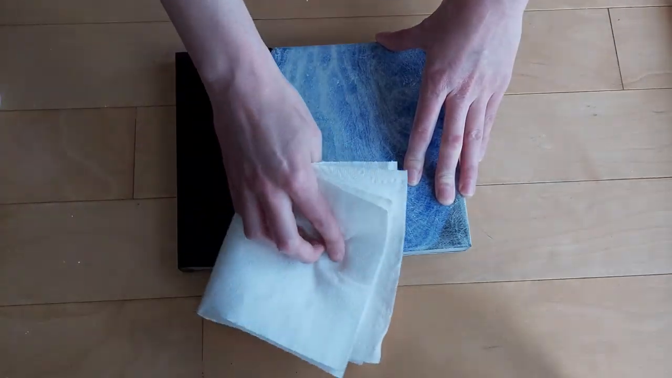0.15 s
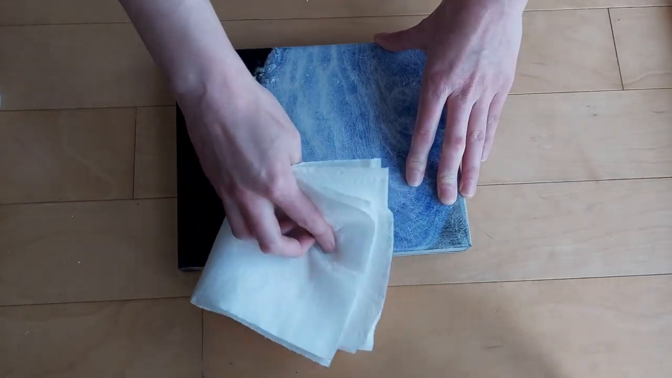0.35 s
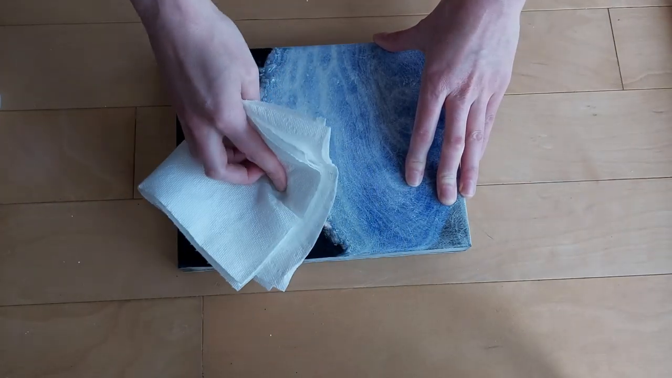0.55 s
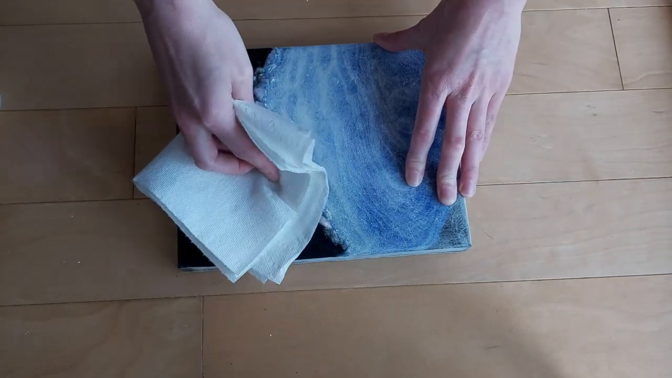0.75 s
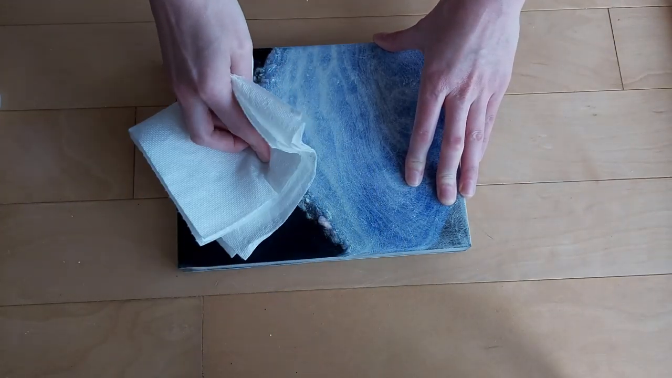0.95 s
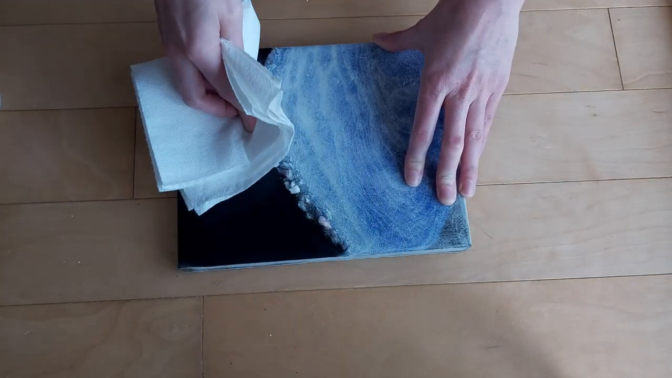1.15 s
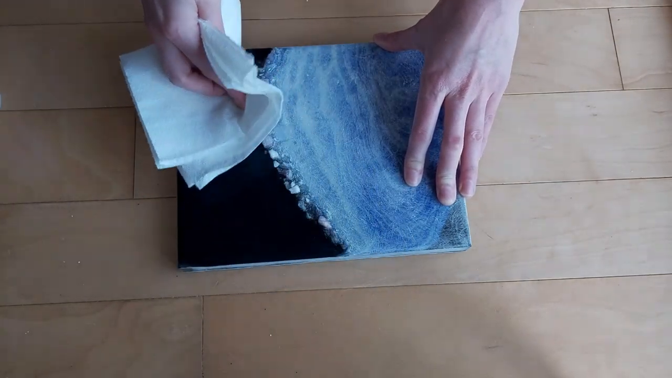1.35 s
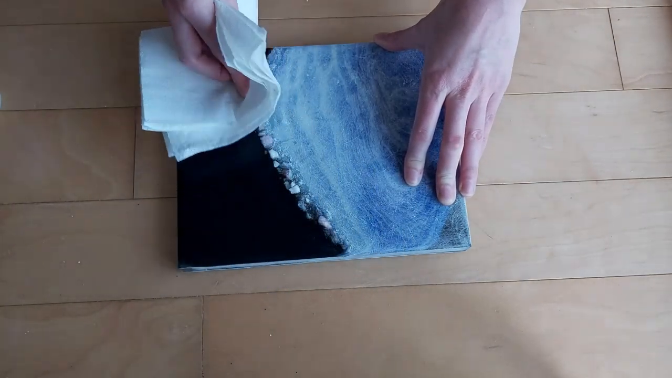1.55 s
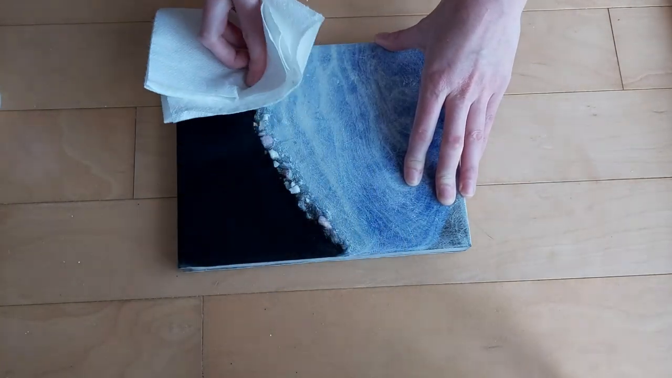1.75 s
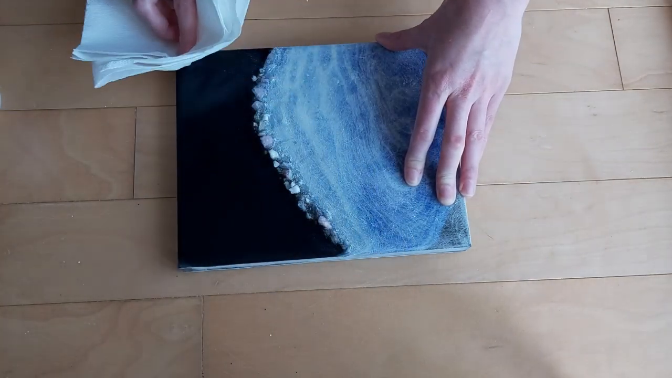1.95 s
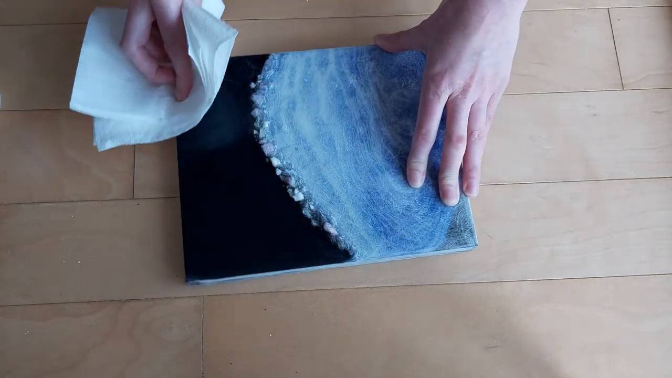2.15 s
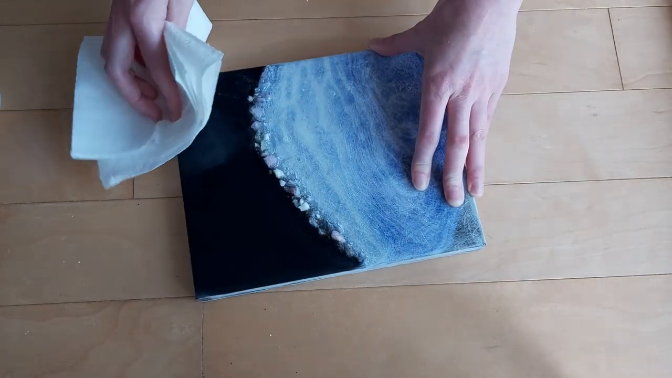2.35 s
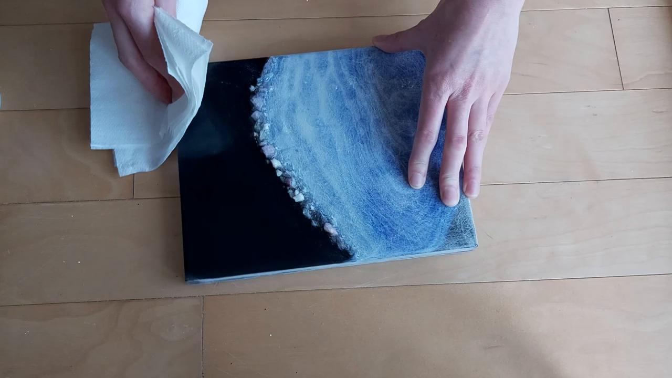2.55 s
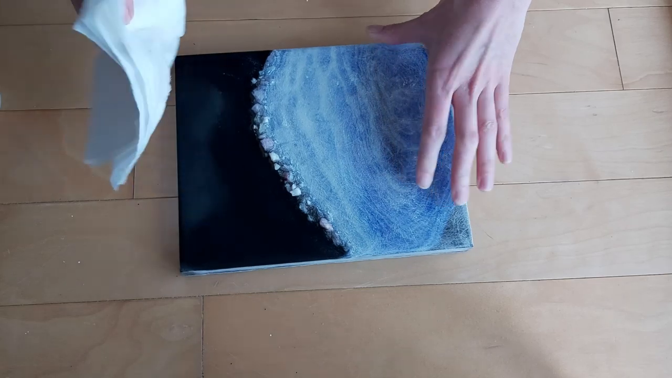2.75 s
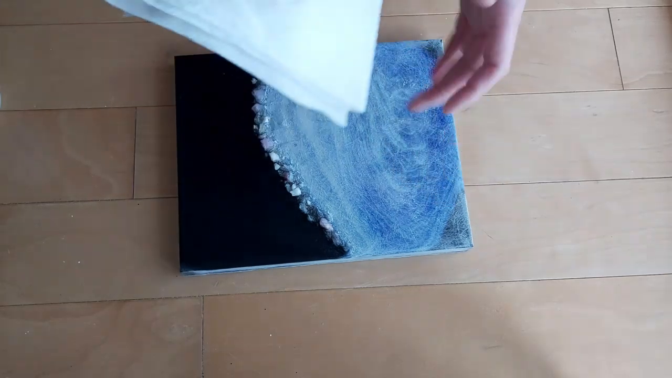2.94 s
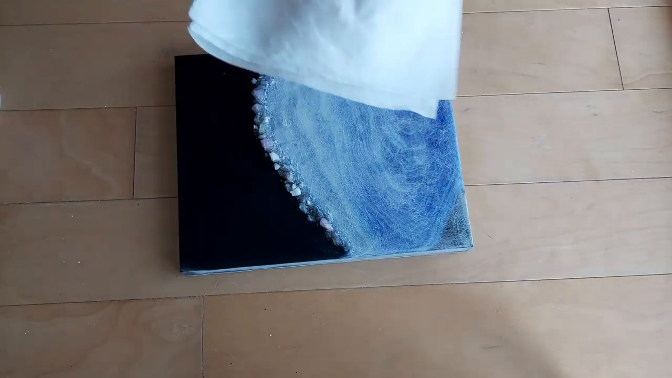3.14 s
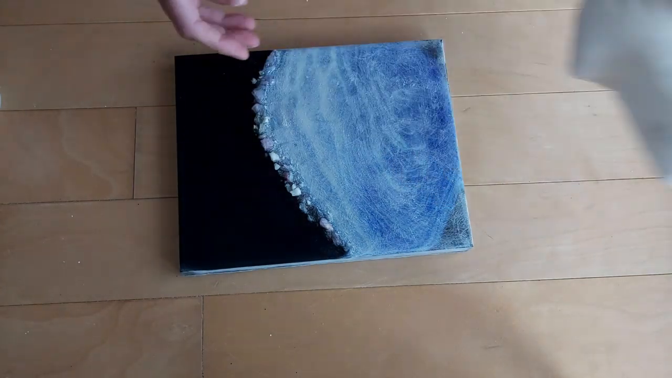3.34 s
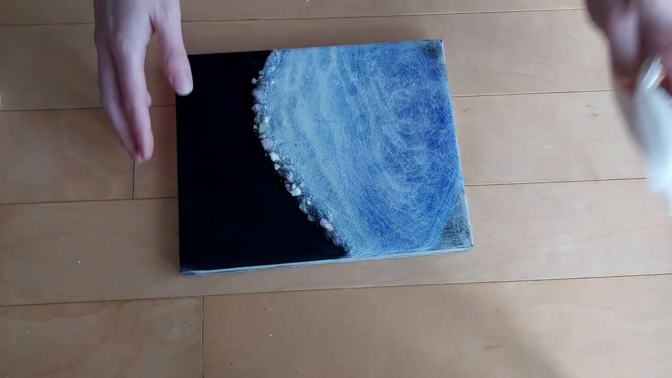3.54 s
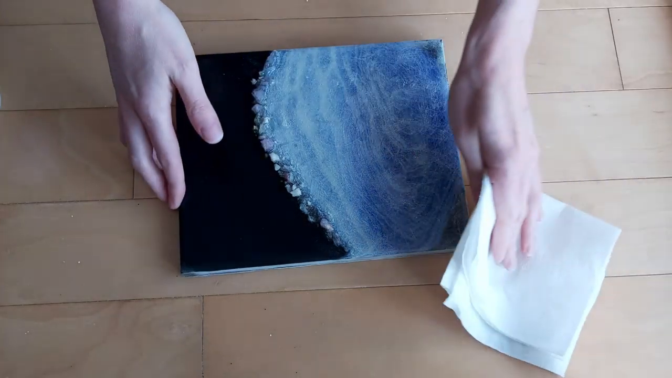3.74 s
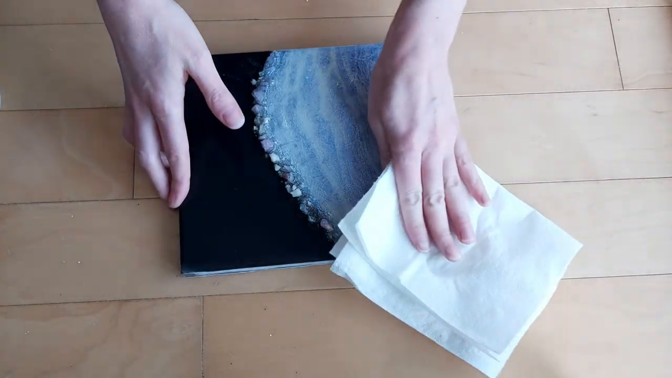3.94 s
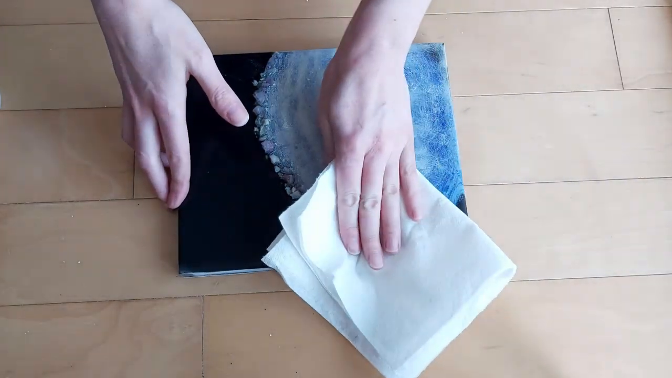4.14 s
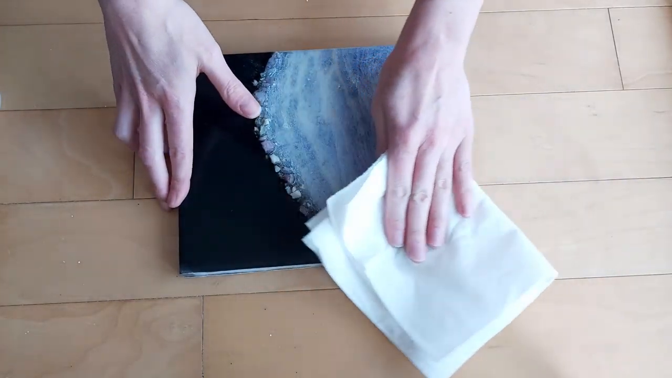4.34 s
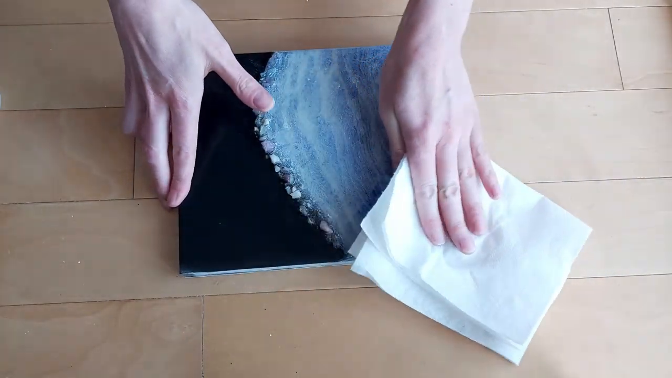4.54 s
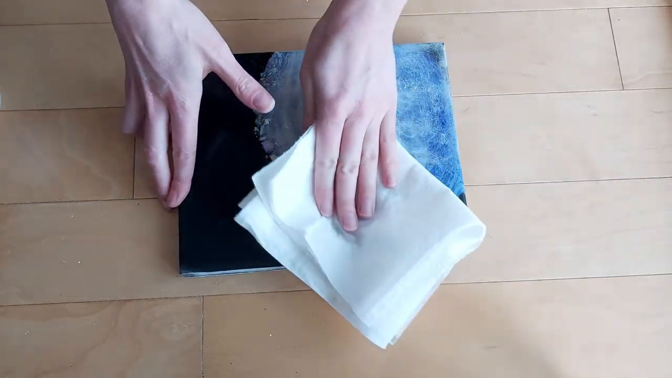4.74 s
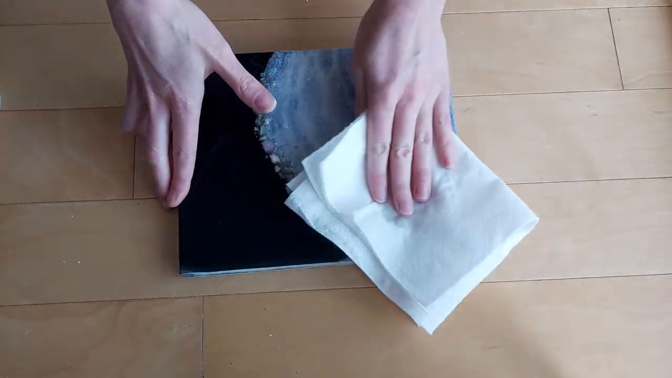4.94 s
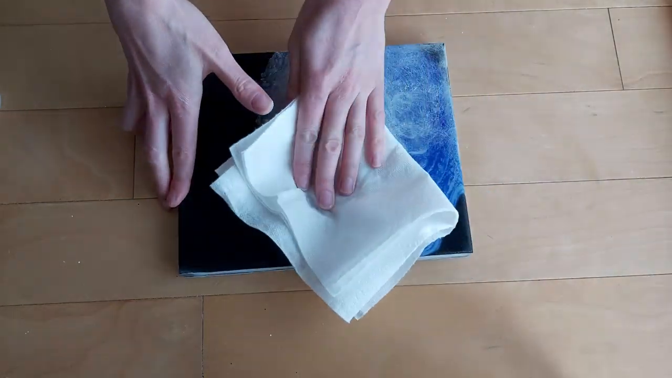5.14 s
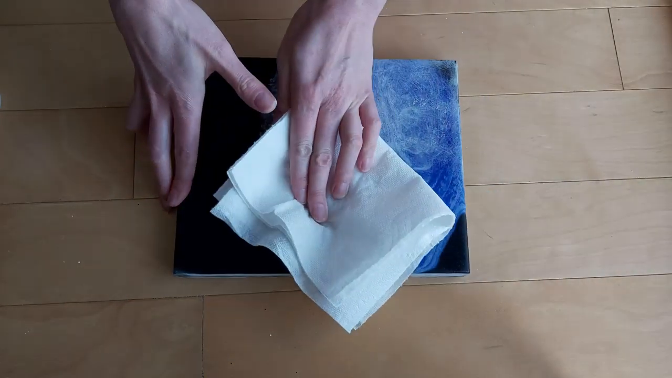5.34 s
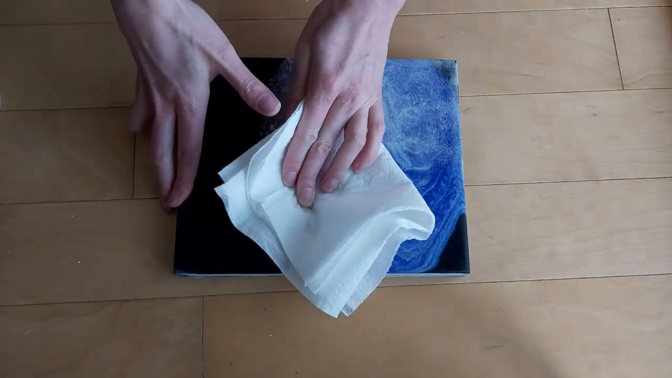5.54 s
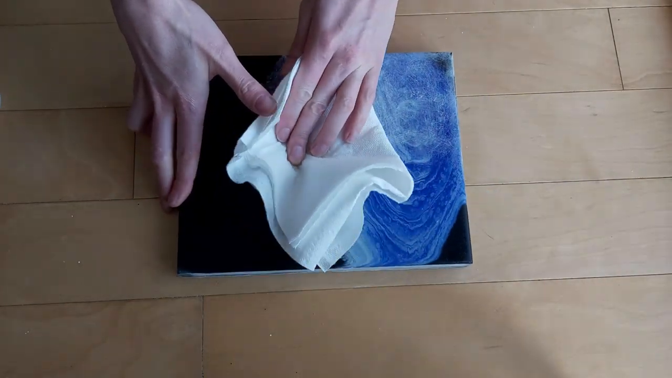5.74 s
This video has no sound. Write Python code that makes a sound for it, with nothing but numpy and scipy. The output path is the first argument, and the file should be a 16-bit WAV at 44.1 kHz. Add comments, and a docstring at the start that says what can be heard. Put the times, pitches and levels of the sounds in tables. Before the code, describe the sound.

Close stereo sound of a folded damp paper towel wiping a painted canvas on a wooden floor. Soft, fibrous strokes come about four a second, then the canvas jolts with a loud hollow knock and further bumps. The towel is handled quietly, and louder, crisper scrubbing follows with small snags. A small room adds a short faint reflection over low air noise, slightly left.

```python
"""A quiet room with a wooden floor: a damp paper towel scrubs a coated canvas, heard close up in stereo.
Paper fibres catch and slip in dense tiny clicks, made of noise with uneven sizes, in three spectral bands.
The stretched canvas and its frame hum like a drum when pushed, slid or knocked on the boards: noise and
soft pulses pass through resonances. Folds snag, damp paper squeaks, and air noise and mains hum lie behind."""
import sys
import numpy as np
from scipy import signal
from scipy.fft import rfft, irfft, next_fast_len
from scipy.io import wavfile
from scipy.ndimage import uniform_filter1d

SR = 44100
rng = np.random.default_rng(int(sys.argv[2]) if len(sys.argv) > 2 else 0)


def int16_out(signal):
    """Quantize to a 16-bit WAV file."""
    q = np.round(np.clip(np.atleast_2d(signal).T, -1, 1) * 32767)
    wavfile.write(sys.argv[1], SR, q.astype(np.int16))


N = 259746  # length in samples

# resonances of the stretched canvas on its frame: pitch_hz, width_hz, level_db [relative]
CANVAS_MODES = [(199, 46, -15), (270.4, 22.6, -10), (357.9, 19.6, -0.5), (433, 15.8, -0.5),
                (487.6, 22.5, -4.5), (554, 62, -7.5), (679, 43, -7), (825, 120, -12.5), (1180, 130, -17),
                (1470, 46, -15), (2785, 64, -17.5)]
# spectrum of the coarse scrape, also of the rattle in a knock: pitch_hz, density_db [relative, per Hz]
RASP_SPECTRUM = [(500, -21), (850, -4.5), (1050, 2), (1600, 3.5), (2500, 2.5), (3200, -2.5), (5000, -14)]
RASP_LEFT_DB = 5.5  # left above right, also for snags and squeaks


def gain_of(db):
    """Turns decibels into an amplitude factor."""
    return 10 ** (np.asarray(db) / 20)


def evened(x):
    """Scales a signal to an RMS of one over all its channels."""
    return x / np.sqrt(np.mean(x ** 2) + 1e-20)


def colour(x, points):
    """Filters the channels by a spectrum, drawn between points on a logarithmic pitch axis."""
    point_hz, point_db = np.transpose(points)
    size = next_fast_len(N)
    hz = np.fft.rfftfreq(size, 1 / SR)
    curve_db = np.interp(np.log(hz + 1), np.log(point_hz + 1), point_db)
    return irfft(rfft(x, size) * gain_of(curve_db), size)[..., :N]


def pair(same):
    """Two channels of white noise with the given correlation."""
    left, other = rng.standard_normal((2, N))
    same = np.clip(same, 0, 1)
    return np.array([left, same * left + np.sqrt(1 - same ** 2) * other])


def sides(left_db):
    """Stereo gains that set the left channel this far above the right."""
    return gain_of(np.array([[.5], [-.5]]) * left_db)


def flicker(ms, db):
    """A random gain, smoothed over some milliseconds, with an RMS swing in dB."""
    drift = uniform_filter1d(rng.standard_normal(N), max(int(ms * SR / 1000), 1))
    return gain_of(db * evened(drift))


def mottle(x, db):
    """Patches of the noise's spectrum swell and sink at random over pitch and time."""
    spectra = signal.stft(x, nperseg=512)[2]
    patches = rng.standard_normal(spectra.shape[1:])
    patches = uniform_filter1d(patches, size=3, axis=0)  # across pitch
    patches = uniform_filter1d(patches, size=7, axis=1)  # across time
    return signal.istft(spectra * gain_of(db * evened(patches)), nperseg=512)[1][:, :N]


def swell(rows, motion):
    """Each row (start, rise, hold, dB, change dB) rises, drifts in level, stops fast and lingers; powers add."""
    steepness, stop_db_s, linger_db, fade_db_s = motion
    power = np.zeros(N)
    for start, rise, hold, db, change_db in rows:
        t = np.arange(0, rise + hold + 1, 1 / SR)
        after = np.maximum(t - rise - hold, 0)
        stop = gain_of(-stop_db_s * after)
        linger = gain_of(linger_db - fade_db_s * after)
        end = (stop + linger) / (1 + gain_of(linger_db))
        drift = gain_of(db + change_db * np.clip((t - rise) / hold, 0, 1))
        onset = np.sin(np.pi / 2 * np.minimum(t / rise, 1)) ** steepness
        part = power[round(start * SR):][:len(t)]  # a view: adding to it fills power
        part += ((onset * drift * end) ** 2)[:len(part)]
    return np.sqrt(power)


def ring(x, modes=CANVAS_MODES, sign=-1):
    """Passes a force through modes of the canvas on its frame; the small drum radiates no deep bass."""
    out = 0
    for k, (hz, width, db) in enumerate(modes):
        mode = signal.lfilter(*signal.iirpeak(hz, hz / width, SR), x)
        out = out + sign ** k * gain_of(db) * mode
    return signal.sosfilt(signal.butter(4, 165, "high", fs=SR, output="sos"), out)


def room():
    """Air and appliance noise, mottled over pitch and time, with a wavering mains hum."""
    # spectrum of the air noise: pitch_hz, density_db [relative, per Hz]
    air_spectrum = [(20, -10), (76, 9.5), (130, 15), (249, 5.5), (416, 8), (677, -4), (1370, -3.5),
                    (2990, -14.5), (6050, -1), (8590, -14.5), (16000, -9)]
    # mains hum before wavering and stereo tilt: pitch_hz, level_db [RMS]
    hum_tones = [(59, -80)]
    t = np.arange(N) / SR
    hum = sum(gain_of(db) * np.sqrt(2) * np.sin(2 * np.pi * hz * t) for hz, db in hum_tones)
    air = gain_of(-69) * evened(mottle(colour(pair(0.34), air_spectrum), db=4.0))
    return sides(9) * (air + hum * flicker(ms=80, db=4))


def towel():
    """Slips of fibres, a few of them large, in three sizes; all share the unevenness of the surface."""
    # wipes or handlings of the towel: start_s, speeding_up_s, moving_s, hiss_db, fizz_db,
    # hiss_and_fizz_change_db [while moving], rasp_db, rasp_change_db [while moving]
    strokes = np.array([(0.055, 0.062, 0.139, -48.0, -48.5, -4, -51.5, 0),
                        (0.352, 0.14, 0.125, -43, -45, -2, -50, -2),
                        (0.77, 0.071, 0.089, -48.5, -52, 1, -50.5, -10),
                        (1.044, 0.045, 0.1, -48.5, -52, 2.0, -58, 5),
                        (1.308, 0.073, 0.097, -48.5, -52.5, 0, -52.5, -1),
                        (1.551, 0.07, 0.13, -49.0, -52, -9, -55.0, -3),
                        (1.796, 0.14, 0.044, -46, -47.5, 0, -52, -5),
                        (2.016, 0.026, 0.14, -63.5, -68, 11.5, -64.0, 6.5),
                        (2.188, 0.015, 0.1, -40.5, -43, -3, -38.5, -5),
                        (2.526, 0.037, 0.11, -54.0, -63, 1, -52.5, 4),
                        (2.82, 0.12, 0.075, -70.5, -61.5, -6.5, -90, 17),
                        (3.128, 0.017, 0.057, -63, -64.5, 4.5, -63.5, 7.5),
                        (3.19, 0.04, 0.14, -54, -53.5, -1.5, -54, -2),
                        (3.375, 0.093, 0.054, -58.5, -61, -12, -58.5, -9.0),
                        (3.524, 0.052, 0.172, -56.5, -54.5, -1, -57, 2.0),
                        (3.775, 0.055, 0.051, -58, -59.5, -5.5, -60.5, -6),
                        (3.884, 0.082, 0.029, -47.0, -46, -1.5, -49.5, -0.5),
                        (3.989, 0.14, 0.016, -38.0, -37.0, -5, -42.5, -4.5),
                        (4.185, 0.02, 0.008, -56.0, -70, -0.0, -50, -1),
                        (4.216, 0.2, 0.11, -44.5, -42, -5.5, -46, -3.0),
                        (4.599, 0.12, 0.082, -43.5, -40, -0.5, -48, 3),
                        (4.837, 0.12, 0.052, -41.5, -38.5, -8.5, -44, -4),
                        (4.997, 0.121, 0.03, -41.0, -38.5, -3.5, -48, 6),
                        (5.227, 0.084, 0.095, -56.5, -62.5, 1, -44.5, -17),
                        (5.459, 0.052, 0.18, -58.0, -57.5, -2, -57, 1.0),
                        (5.657, 0.058, 0.11, -51.5, -50.5, 2.0, -49, -3.0),
                        (5.835, 0.034, 0.021, -50.0, -49, 2.5, -47.5, 8)])
    # spectra of medium and of fine slips, each: pitch_hz, density_db [relative, per Hz]
    hiss_spectrum = [(1500, -21.5), (3000, -9), (4200, -4), (6300, -2.5), (7200, -6), (8300, -11.5),
                     (11000, -35)]
    fizz_spectrum = [(6000, -27), (8300, -10.5), (10000, -6.5), (12500, -3.5), (14500, -2), (16500, -6)]
    # start and end of a wipe: rise_steepness [exponent], stop_db_per_s, linger_db, linger_fade_db_per_s
    towel_motion = (1.3, 494, -10.5, 89)
    sizes = gain_of(1.56 * np.minimum(rng.exponential(1, N), 6))
    slips = sizes * flicker(ms=1.5, db=.9)
    hiss = evened(colour(slips * pair(0.038), hiss_spectrum)) * sides(3.5)
    rasp = evened(colour(slips * pair(0.086), RASP_SPECTRUM)) * sides(RASP_LEFT_DB)
    fizz = evened(colour(slips * pair(0.074), fizz_spectrum)) * sides(9)
    hiss = hiss * swell(strokes[:, [0, 1, 2, 3, 5]], towel_motion)
    fizz = fizz * swell(strokes[:, [0, 1, 2, 4, 5]], towel_motion)
    rasp_gain = swell(strokes[:, [0, 1, 2, 6, 7]], towel_motion)
    return mottle(rasp, db=1.5) * rasp_gain + mottle(hiss + fizz, db=1.52)


def drumming():
    """Steady drag and separate small bumps shake the canvas; a hand pressing its middle favours the upper modes."""
    # pushes or slides, levels before stereo tilt: start_s, building_s, dragging_s, lowest_modes_db,
    # upper_modes_db, change_db [while dragging]
    pushes = np.array([(0.065, 0.015, 0.19, -64.0, -64.5, 2), (0.347, 0.116, 0.15, -64, -64, 7),
                       (0.771, 0.053, 0.069, -56.5, -57.5, 1), (1.034, 0.03, 0.15, -68, -66.5, 4.5),
                       (1.324, 0.003, 0.165, -59, -57.5, 4.5), (1.526, 0.091, 0.12, -66, -66.5, 5.5),
                       (1.801, 0.11, 0.21, -63.5, -66, -4.5), (1.914, 0.0052, 0.077, -55, -56, -11),
                       (2.115, 0.065, 0.03, -53.5, -56, -1.5), (2.189, 0.0068, 0.085, -36.5, -39.5, 4),
                       (2.519, 0.034, 0.099, -45, -48, 4), (3.213, 0.0032, 0.2, -50.5, -52.5, -22.5),
                       (3.525, 0.088, 0.16, -63.5, -62.5, 3), (4.13, 0.04, 0.065, -62, -52.0, -1.5),
                       (4.28, 0.074, 0.021, -56.5, -61, -1), (4.395, 0.079, 0.017, -64, -65, 7),
                       (4.71, 0.062, 0.04, -71, -56, 4), (4.846, 0.086, 0.04, -61.5, -52.5, 1.5),
                       (5.209, 0.12, 0.049, -44.5, -44, -6.5), (5.447, 0.069, 0.18, -57.0, -57, -4),
                       (5.665, 0.12, 0.012, -49.5, -47, -8.5), (5.795, 0.025, 0.078, -57, -60.5, 5)])
    # start and end of a push: rise_steepness [exponent], stop_db_per_s, linger_db, linger_fade_db_per_s
    canvas_motion = (1.5, 389, -3, 151)
    bump_times = rng.random(N) < 350 / SR  # about 350 bumps per second
    bumps = gain_of(2.5 * np.minimum(rng.exponential(1, N), 3)) * bump_times
    judder = 2.3 + evened(uniform_filter1d(bumps, size=40))
    # the lowest mode is wide in stereo, the next two nearly central
    central = ring(pair(.97) * judder, CANVAS_MODES[1:3])
    wide = ring(pair(.4) * judder, CANVAS_MODES[:1])
    lowest = evened(central + wide)
    upper = evened(ring(pair(0.57) * judder, CANVAS_MODES[3:]))
    lowest_gain = swell(pushes[:, [0, 1, 2, 3, 5]], canvas_motion)
    upper_gain = swell(pushes[:, [0, 1, 2, 4, 5]], canvas_motion)
    return lowest * lowest_gain + upper * upper_gain


def knocks():
    """Each knock is a soft push into the modes, a short brighter rattle and a dull thump in the boards."""
    # the frame knocks on the floor: start_s, push_peak_db [before stereo tilt],
    # rattle_db [hardness, relative to push_peak_db], thump_db [relative to push_peak_db]
    hits = [(0.078, -52.5, -12, 1), (0.81, -52, 2, -3), (1.326, -38.5, -13, -24), (1.475, -37.5, -20, -32),
            (1.738, -45.5, -0.5, -28), (1.916, -38.5, -18, -35), (2.155, -46, -19, -25),
            (2.192, -28, -34, -31), (2.544, -40, -26, -12.5), (2.632, -31, -25, -39),
            (2.643, -33, -28, -39), (3.215, -41.5, -6, -12.5), (3.227, -48, -14, -36),
            (5.253, -47, -14, -4), (5.699, -50, 0.5, -5)]
    # spectrum of the boards: pitch_hz, density_db [relative, per Hz]
    thump_spectrum = [(60, -9), (110, 8), (170, 4), (300, -20.5)]
    out, t = np.zeros((2, N)), np.arange(8000) / SR
    # a pulse of 60 samples; each fade below is the time to fall by 60 dB
    push = ring(np.pad(signal.windows.hann(60), (0, len(t) - 60)), sign=1)
    push = push * gain_of(-60 * t / 0.21)
    boards = evened(colour(pair(0.63), thump_spectrum)) * sides(6.7)
    rattles = evened(colour(pair(1.0), RASP_SPECTRUM))
    for start, db, rattle_db, thump_db in hits:
        at = slice(round(start * SR), round(start * SR) + len(t))
        rattle = rattles[:, at] * gain_of(rattle_db - 60 * t / .09)
        thump_shape = gain_of(thump_db - 60 * t / 0.44) * (1 - np.exp(-t / 0.0077))
        thump = boards[:, at] * thump_shape
        out[:, at] += gain_of(db) * (push / abs(push).max() + rattle + thump)
    return out


def catches():
    """A fold of paper snags on raised paint and lets go: a short scuff of noise rings around its own pitch."""
    # snags: start_s, peak_db [before stereo tilt], pitch_hz
    snags = [(0.594, -43, 910), (3.303, -43, 4300), (3.35, -43.5, 780), (4.124, -37, 1040),
             (4.136, -37.5, 525), (4.209, -39.5, 1010), (4.72, -38, 1210), (4.764, -42.5, 493),
             (4.788, -41.5, 1393)]
    out, t = np.zeros((2, N)), np.arange(4000) / SR
    shape = np.minimum(t / 0.0034, 1) * gain_of(-60 * t / 0.075)  # 3.4 ms attack, 60 dB down in 75 ms
    for start, db, hz in snags:
        scuff = signal.lfilter(*signal.iirpeak(hz, 4, SR), pair(0.72)[:, :len(t)] * shape)
        at = round(start * SR)
        out[:, at:at + len(t)] += gain_of(db) * scuff / abs(scuff).max()
    return out * sides(RASP_LEFT_DB)


def squeaks():
    """Damp paper chirps unevenly on the coating: narrow bands of noise swell, fade and flicker."""
    # faint wet squeaks: start_s, length_s, pitch_hz, level_db [before swell, flicker and stereo tilt]
    chirps = [(2.35, 0.17, 1410, -65), (3.627, 0.047, 1970, -61)]
    out, t = np.zeros((2, N)), np.arange(N) / SR
    for start, length, hz, db in chirps:
        fuzzy = evened(signal.lfilter(*signal.iirpeak(hz, 9, SR), pair(0.5)))
        out += gain_of(db) * fuzzy * np.sin(np.pi * np.clip((t - start) / length, 0, 1))
    return out * flicker(ms=17, db=4.5) * sides(RASP_LEFT_DB)


def walls(x):
    """A dying tail of scattered reflections, different for each channel."""
    t = np.arange(SR // 2) / SR
    # starts after 6 ms and falls 60 dB in 0.13 s
    tail = rng.standard_normal((2, len(t))) * gain_of(-60 * t / 0.13) * (t > .006)
    return signal.fftconvolve(x, tail / np.linalg.norm(tail[0]), axes=1)[:, :N]


def scene():
    """Mixes the close sounds, their faint reflections and the room."""
    canvas = sides(4.5) * (drumming() + knocks())
    canvas[0] = np.roll(canvas[0], shift=5)  # in samples: the canvas sound reaches the right port first
    near = towel() + catches() + squeaks() + canvas
    return near + gain_of(-12.5) * walls(near) + room()


def record(dry):
    """The band limit: a steep low-pass filter at 15780 Hz."""
    low_pass = signal.firwin(1023, 15780, window=("kaiser", 9), fs=SR)
    return signal.oaconvolve(dry, low_pass[None], "same")


dry = scene()
out = record(dry)
int16_out(out)
```